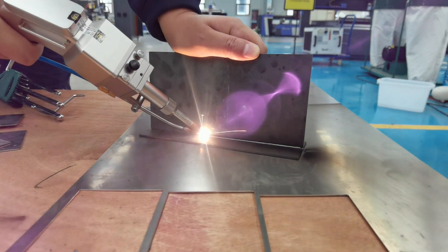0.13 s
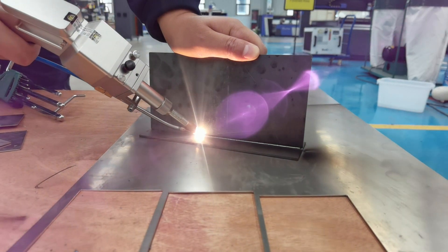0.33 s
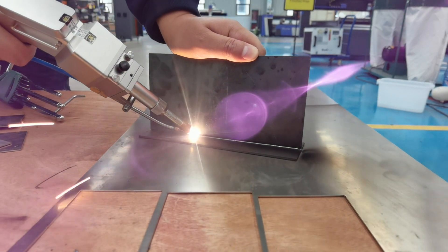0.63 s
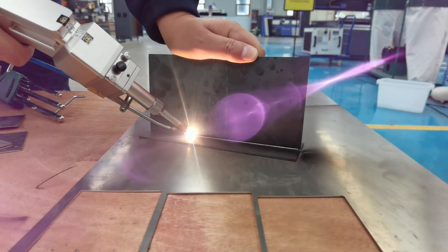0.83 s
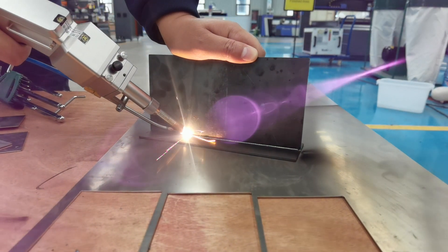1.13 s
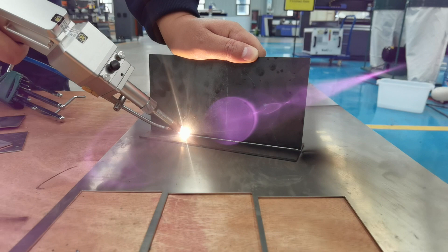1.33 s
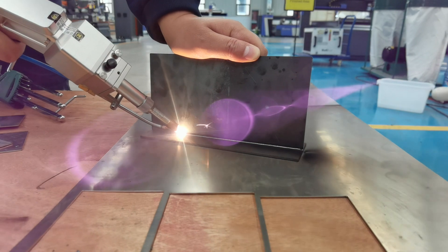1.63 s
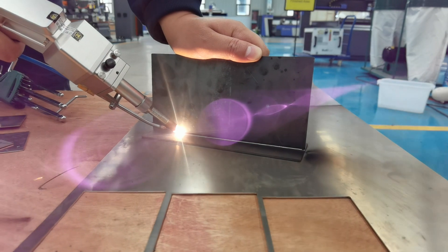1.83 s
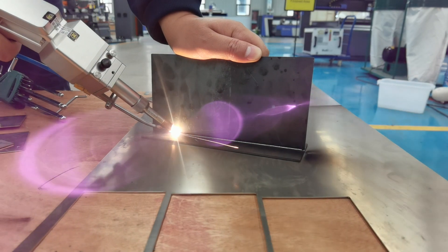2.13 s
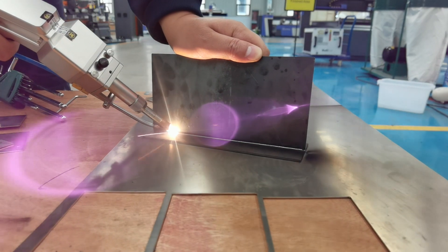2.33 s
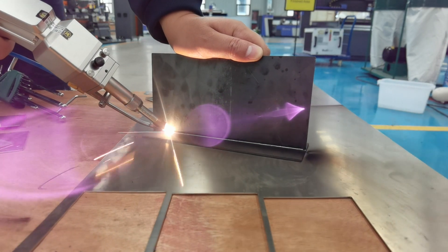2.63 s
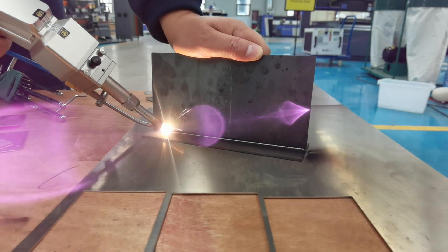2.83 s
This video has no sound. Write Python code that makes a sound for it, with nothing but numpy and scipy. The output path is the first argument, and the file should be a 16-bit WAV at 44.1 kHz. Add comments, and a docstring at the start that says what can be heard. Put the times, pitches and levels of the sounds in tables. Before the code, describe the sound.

Close, steady sizzling hiss of gas and metal vapour from a welding torch on steel plate, already running and never stopping, slightly flickering, with small pops; very faint low workshop hum and air noise beneath.

```python
"""A bright, finely crackling hiss runs throughout, in front: a hand-held laser welder seams a steel plate.
Shielding gas and metal vapour make turbulent noise, which flickers band by band, sputters and pops.
The torch creeps left, so the delay and level at each ear change; the plates colour each ear's hiss.
Behind it are the hall's reverberation, noise-like ventilation, wavering mains hum and short drones."""
import sys
import numpy as np
from scipy import signal
from scipy.fft import rfft, irfft
from scipy.io import wavfile
from scipy.ndimage import uniform_filter1d, map_coordinates

SR = 44100
rng = np.random.default_rng(int(sys.argv[2]) if len(sys.argv) > 2 else 0)


def inscribe(sig):
    """Save sig as 16-bit PCM at rate SR to the path in sys.argv[1].

    A 1-D sig is mono; a 2-D sig holds one channel per row.
    Samples are clipped to [-1, 1] before scaling.
    """
    pcm = np.round(np.clip(np.atleast_2d(sig).T, -1, 1) * 32767)
    wavfile.write(sys.argv[1], SR, pcm.astype(np.int16))


N = 131418
TIME, FREQS = np.arange(N) / SR, np.arange(N // 2 + 1) * SR / N   # s, Hz

# Strength of the whole jet: time_s, gain_db
JET_STRENGTH = [(0, 4.5), (.11, 2.5), (.135, -1), (.17, -1.7), (.19, 2), (.5, 3), (1.1, 2.1), (1.7, 0.97),
                (2.15, 0.9), (2.4, 0.6), (2.75, 0.1), (2.98, 1)]
# Gain of the jet's low roar: time_s, gain_db
ROAR_GAIN = [(0, -2.5), (.15, -4.5), (.25, -4), (.7, 1), (1.3, 0.5), (2, 0), (2.5, 0.5), (2.98, -2.5)]
# Gain of the jet's bright core: time_s, gain_db
CORE_GAIN = [(0, -4.5), (.3, -0.5), (.7, -1), (1.3, 1), (2.1, -1), (2.6, -0.5), (2.98, -.5)]
# Gain of the jet's treble: time_s, gain_db
TREBLE_GAIN = [(0, 2.3), (.15, 4.5), (.3, 1.5), (.7, -0.5), (1.5, 0.4), (2.2, 2), (2.98, -1.5)]
# Larger pops of spatter: start_s, level_db (above the hiss)
SPATTER_POPS = [(0.096, 3), (0.121, 3), (1.353, 6), (2.867, 6)]
# Early echoes off the bench and nearby machines: delay_ms, gain_db
EARLY_ECHOES = [(3.6, -34), (5.9, -22), (7.5, -20.5), (10.3, -16.5), (17.9, -17.5)]
# Share of the hiss power arriving directly, the rest by way of the hall: frequency_hz, share_0_to_1
DIRECT_POWER_SHARE = [(340, 0.71), (690, 0.85), (1590, 0.91), (1680, 0.64), (1850, 0.84), (1980, 0.65),
                      (2200, 0.78), (2450, 0.67), (2630, 0.93), (3060, 0.88), (3320, 0.33), (3490, 0.25),
                      (3570, 0.51), (3750, 0.44), (3960, 0.88), (4950, 0.75), (5040, 0.52), (5170, 0.8),
                      (5340, 0.79), (5430, 0.6), (5680, 0.92), (6500, 0.91), (6980, 0.68), (7410, 0.87),
                      (7880, 0.73), (8230, 0.89), (8830, 0.79), (9300, 0.33), (9390, 0.68), (10210, 0.91),
                      (12020, 0.34), (12620, 0.54), (12880, 0.07), (13520, 0.54), (14080, 0.22),
                      (14210, 0.73), (14810, 0.27), (15590, 0.7)]
# Colour the plates give the hiss at the left ear: frequency_hz, gain_db
LEFT_PLATE_GAIN = [(100, -52), (340, -32.4), (430, -29.3), (520, -28.8), (650, -24.0), (780, -25.2),
                   (1080, -23.3), (1770, -10.3), (1940, -9.6), (2110, -12.1), (2280, -11.3), (2500, -14.1),
                   (2800, -15.0), (2890, -14.3), (3490, -16.0), (3700, -14.6), (3830, -17.4), (4180, -12.5),
                   (4260, -15.8), (4570, -13.6), (4910, -6.5), (5250, -7.2), (5600, -1.6), (5860, -0.3),
                   (6200, -5.1), (6460, -4.5), (6800, -13.5), (6980, -15.5), (7360, -11.5), (8610, -5.7),
                   (9690, -14.4), (9950, -5.8), (10420, -5.0), (10940, -8.7), (11200, -16.3),
                   (11670, -23.4), (11800, -18.0), (12750, -16.7), (13050, -19.7), (13700, -16.8),
                   (14470, -25.3), (14900, -19.6), (15590, -18.9)]
# Colour the plates give the hiss at the right ear: frequency_hz, gain_db
RIGHT_PLATE_GAIN = [(100, -52), (340, -32.5), (430, -30.0), (520, -32.1), (690, -25.5), (820, -29.6),
                    (950, -24.9), (1160, -26.6), (1290, -20.1), (1420, -17.1), (1510, -16.6), (1720, -21.7),
                    (1850, -17.4), (1980, -19.4), (2070, -18.4), (2200, -12.8), (2280, -11.3),
                    (2670, -14.7), (3060, -16.1), (3450, -24.7), (3620, -18.7), (3750, -20.8),
                    (4090, -13.0), (4440, -14.8), (4650, -10.1), (5040, -14.6), (5250, -8.3), (5430, -13.9),
                    (5640, -4.7), (5860, -0.5), (6120, -5.3), (6290, 0.6), (6930, -7.8), (7710, -9.6),
                    (8270, -5.8), (8610, -6.7), (9000, -14.9), (9730, -13.0), (9860, -9.4), (10250, -9.2),
                    (10640, -16.0), (10940, -16.5), (12100, -27.0), (12580, -23.0), (12880, -29.4),
                    (13520, -20.5), (14170, -21.2), (14430, -24.7), (15590, -19.3)]
# Extra lag at the right ear from reflections off the plates: frequency_hz, lag_rad
RIGHT_PLATE_LAG = [(340, -0.48), (780, -0.02), (900, -0.23), (1120, 0.29), (1250, -0.01), (1640, 0.95),
                   (1770, -0.29), (1940, -0.28), (2150, -1.16), (2410, -0.38), (2630, 0.65), (3320, 0.15),
                   (3530, -1.2), (3920, -0.45), (4520, -0.38), (4650, 0.52), (4820, 0.82), (5000, 0.42),
                   (5080, -0.75), (5340, -0.11), (5600, -1.69), (6030, -0.99), (6160, -1.42), (6850, -0.76),
                   (7360, 1.56), (7670, 1.84), (7970, 0.86), (8310, 1.25), (8960, 0.62), (9350, -1.49),
                   (9520, -1.54), (9730, 0.58), (11630, -0.52), (11710, 1.79), (12140, -0.38),
                   (12830, 1.59), (13010, 3.09), (14940, 5.99), (15120, 10.56), (15590, 10.47)]
# The torch moves left: time_s, right_ear_delay_us, left_gain_db, right_gain_db
TORCH_TRAVEL = [(0, 109, -2, 1.5), (.6, 124.4, -2, 1.5), (1.1, 138.6, -0.5, 2.5), (2.1, 153.4, 0, 2.5),
                (2.45, 155.5, 0, 0), (2.98, 160.5, 1.5, 0.2)]
# Bands whose stereo width varies: low_hz, high_hz
WIDTH_BANDS = [(2620, 3057), (3930, 4287), (7540, 7700)]
# Gain of what the ears share in those bands: time_s, lower_band_db, middle_band_db, upper_band_db
SHARED_GAIN = [(0, 5.5, 5, -1), (.25, -3, -6, 4), (.5, -1, -28, 1), (.85, 3, -7, 5), (1.25, -14, -12, -7),
               (1.55, -9, -12, -3), (2, -28, -24, -1), (2.4, -38, -15, -5), (2.72, -36, -17, -14),
               (2.98, -6, 2, -2)]
# Spectrum of the ventilation: frequency_hz, relative_level_db
VENT_SPECTRUM = [(20, -16), (42, 1.5), (100, 4.5), (130, 3), (200, 7.5), (260, -1), (320, 3.5), (450, -40),
                 (900, -8), (2000, -25), (3000, -35)]
# Course of the ventilation's level: time_s, gain_db
VENT_COURSE = [(0, 8.5), (.12, 0), (.7, 0), (1.6, -0.5), (2, -3), (2.98, -1)]
# Mains hum components: frequency_hz, level_db (rms, before waver and course)
HUM_TONES = [(101, -66), (199, -61.5)]
# Course of the hum's level: time_s, gain_db
HUM_COURSE = [(0, 0), (.8, -2), (1.1, 2.5), (1.7, 1.5), (2.3, -1.5), (2.98, -2.5)]
# Faint machine drones: start_s, length_s, pitch_hz, rise_hz_per_s, level_db (rms at the crest)
MACHINE_DRONES = [(-.03, 0.1, 105, 2, -51), (.62, 0.38, 401, 0, -54.5), (0.857, 0.39, 569, 150, -55)]
# Spectrum of the brief swell of low rush: frequency_hz, relative_level_db
RUSH_SPECTRUM = [(250, -24), (420, 2.5), (600, 5.5), (900, 0), (1300, 9.5), (2000, -22)]

JET_LOW_HZ, ROAR_EDGE_HZ = 375, 2500
CORE_LOW_HZ, CORE_HIGH_HZ = 4470, 5900
TREBLE_LOW_HZ, TREBLE_HIGH_HZ = 6850, 10430
SPUTTER_DB, SPUTTER_HZ = .38, 120     # flicker of the whole hiss
PATCHY_DB, PATCHY_HZ = 1.56, 45       # each band's own flicker
CRACKLES_PER_S, CRACKLE_SPREAD_DB, CRACKLE_DB = 1500, 3, -9.5
POP_DECAY_S = 0.0025
LEFT_DB, RIGHT_DB = -14, -17          # hiss at each ear, before the travel gains
HALL_SMEAR_S = 0.0043                 # reflections blur the sputter over this time
VENT_DB, VENT_GUST_DB, VENT_GUST_HZ = -56, 2, 14
SIDE_DB, SIDE_LOW_HZ = -13, 90        # left-right difference in the low noises
HUM_WAVER_DB, HUM_WAVER_RAD, HUM_WAVER_HZ = 2.5, 1.06, 14
DRONE_WAVER_RAD, DRONE_WAVER_HZ = .5, 28
RUSH_START_S, RUSH_LENGTH_S, RUSH_DB = 1.793, 0.196, -38.5   # rms at the crest
PEAK_LIMIT, CUTOFF_HZ = .88, 15600


def jet():
    """Turbulence: broadband noise with band-by-band fluctuation, impulsive crackle and decaying pops."""
    gas = turbulent_gas() + from_db(CRACKLE_DB) * crackle()
    x = gas * from_db(SPUTTER_DB * drift(SPUTTER_HZ)) + spatter()
    x = high_passed(x, 2, JET_LOW_HZ)
    spectrum = rfft(x)
    roar = irfft(spectrum / (1 + (FREQS / ROAR_EDGE_HZ) ** 6), N)
    core = irfft(spectrum * ((FREQS > CORE_LOW_HZ) & (FREQS < CORE_HIGH_HZ)), N)
    treble = irfft(spectrum * ((FREQS > TREBLE_LOW_HZ) & (FREQS < TREBLE_HIGH_HZ)), N)

    # in turn, add to the hiss what each band gains or loses
    for band, gain in ((roar, ROAR_GAIN), (core, CORE_GAIN), (treble, TREBLE_GAIN)):
        x = x + band * (from_db(in_time(gain)[0]) - 1)
    return x * from_db(in_time(JET_STRENGTH)[0])


def turbulent_gas():
    """Independent fluctuation: each frequency band of the noise varies in level on its own; rms 1."""
    white, gas = rfft(rng.standard_normal(N)), 0
    edges_hz = np.r_[0, np.geomspace(500, 16000, 22), SR]
    for low, high in zip(edges_hz, edges_hz[1:]):
        band = irfft(white * ((FREQS >= low) & (FREQS < high)), N)
        gas = gas + band * from_db(PATCHY_DB * drift(PATCHY_HZ))
    return rms_one(gas)


def crackle():
    """Shot noise: clicks of random time, size and sign; rms 1."""
    size_db = CRACKLE_SPREAD_DB * np.minimum(rng.exponential(1, N), 6)
    sizes = from_db(size_db) * rng.choice([-1, 1], N)
    return rms_one(sizes * (rng.random(N) < CRACKLES_PER_S / SR))


def spatter():
    """Exponential decay: each pop is a burst of noise that starts abruptly and dies away."""
    envelope = 0
    for start, db in SPATTER_POPS:
        decay = np.exp(-np.abs(TIME - start) / POP_DECAY_S)
        envelope = envelope + from_db(db) * (TIME >= start) * decay
    return rng.standard_normal(N) * envelope


def echoed(x):
    """Comb filtering: early echoes added to the hiss put a fine ripple into its spectrum."""
    return x + sum(from_db(db) * np.roll(x, int(ms * SR / 1000)) for ms, db in EARLY_ECHOES)


def at_ears(x):
    """Interaural difference: delay, level and plate reflections differ between the two ears."""
    delay_us, left_db, right_db = in_time(TORCH_TRAVEL)
    share = np.clip(over_hz(DIRECT_POWER_SHARE), 0, 1)
    direct = np.sqrt(share) * rfft(x)
    diffuse = np.sqrt(1 - share) * rfft(hall(x))
    left, right = irfft(direct + diffuse, N)
    left = coloured(left, LEFT_PLATE_GAIN)
    right = coloured(right, RIGHT_PLATE_GAIN, over_hz(RIGHT_PLATE_LAG))

    # read the right ear's sound at a moving, fractional delay
    position = (TIME - delay_us / 1e6) * SR
    right = map_coordinates(right, [position], order=5, mode="mirror")
    return np.array([left * from_db(LEFT_DB + left_db), right * from_db(RIGHT_DB + right_db)])


def hall(x):
    """Diffuse field: independent noise on each side follows the jet's power, slightly blurred in time."""
    power = uniform_filter1d(x ** 2, max(2, int(HALL_SMEAR_S * SR)))
    return rng.standard_normal((2, N)) * np.sqrt(np.abs(power))


def varied_width(ears):
    """Stereo width: the part common to both ears is turned up or down in three bands; low sounds hollow."""
    common = rfft(ears.mean(axis=0))
    for (low, high), db in zip(WIDTH_BANDS, in_time(SHARED_GAIN)):
        band = 1 / (1 + ((2 * FREQS - low - high) / (high - low)) ** 12)
        ears = ears + (from_db(db) - 1) * irfft(common * band, N)
    return ears


def mains_hum():
    """Modulated tones: sines waver at random in level and phase."""
    hum = 0
    for hz, db in HUM_TONES:
        level = from_db(db + HUM_WAVER_DB * drift(HUM_WAVER_HZ))
        phase = 2 * np.pi * hz * TIME + HUM_WAVER_RAD * drift(HUM_WAVER_HZ)
        hum = hum + np.sqrt(2) * level * np.sin(phase)   # root 2 turns rms into peak
    return hum * from_db(in_time(HUM_COURSE)[0])


def machine_drones():
    """Frequency glide: the phase is the integral of a steady or rising pitch, with a random waver."""
    drones = 0
    for start, length, hz, rise, db in MACHINE_DRONES:
        elapsed = TIME - start
        phase = 2 * np.pi * (hz + .5 * rise * elapsed) * elapsed
        phase = phase + DRONE_WAVER_RAD * drift(DRONE_WAVER_HZ)
        drones = drones + np.sqrt(2) * from_db(db) * arch(start, length) * np.sin(phase)
    return drones


def rush_swell():
    """Amplitude envelope: low coloured noise rises and falls once."""
    return from_db(RUSH_DB) * arch(RUSH_START_S, RUSH_LENGTH_S) * low_noise(RUSH_SPECTRUM)


def ventilation():
    """Flow noise: coloured low noise flutters about a slowly changing level."""
    level_db = VENT_DB + in_time(VENT_COURSE)[0] + VENT_GUST_DB * drift(VENT_GUST_HZ)
    return from_db(level_db) * low_noise(VENT_SPECTRUM)


def workshop():
    """Superposition: hum, drones, swell and ventilation add linearly."""
    return mains_hum() + machine_drones() + rush_swell() + ventilation()


def low_noise(spectrum):
    """Interaural coherence: a weak side signal, fading in the deep bass, widens common noise; rms 1."""
    mid, side = rng.standard_normal((2, N))
    side = high_passed(side, 1, SIDE_LOW_HZ)
    return coloured(mid + from_db(SIDE_DB) * np.array([side, -side]), spectrum)


def from_db(db):
    """Logarithmic level: decibels to amplitude gain."""
    return 10 ** (np.asarray(db) / 20)


def rms_one(x):
    """Normalisation: scale to unit rms."""
    return x / np.sqrt(np.mean(x ** 2) + 1e-20)


def in_time(rows):
    """Linear interpolation: each column of a curve at every sample."""
    seconds, *columns = np.transpose(rows)
    return [np.interp(TIME, seconds, column) for column in columns]


def over_hz(points):
    """Logarithmic pitch axis: a table interpolated at every frequency."""
    hz, value = np.transpose(points)
    return np.interp(np.log(FREQS + 1), np.log(hz), value)


def high_passed(x, order, hz):
    """High-pass filtering: weaken what lies below the given frequency."""
    return signal.sosfilt(signal.butter(order, hz, "high", fs=SR, output="sos"), x)


def coloured(x, spectrum, lag_rad=0):
    """Linear filtering: multiply the spectrum by a gain and a phase lag; rms 1."""
    response = from_db(over_hz(spectrum)) * np.exp(-1j * lag_rad)
    return rms_one(irfft(rfft(x) * response, N))


def drift(hz):
    """Low-passed noise: random motion, mostly slower than the given rate, of mean 0 and rms 1."""
    low_pass = (FREQS > 0) / (1 + (FREQS / hz) ** 2)
    return rms_one(irfft(rfft(rng.standard_normal(N)) * low_pass, N))


def arch(start, length):
    """Envelope: a rounded rise and fall, the root of a half sine."""
    return np.sqrt(np.abs(np.sin(np.pi * np.clip((TIME - start) / length, 0, 1))))


def scene():
    """Superposition: the weld close by and the workshop around it."""
    return varied_width(at_ears(echoed(jet()))) + workshop()


def record(dry):
    """Saturation and band limiting: the highest peaks are rounded and the top is cut steeply."""
    rounded = dry / (1 + (dry / PEAK_LIMIT) ** 8) ** (1 / 8)
    # passband ripple 0.1 dB, stopband 90 dB down
    low_pass = signal.ellip(12, .1, 90, CUTOFF_HZ, fs=SR, output="sos")
    return signal.sosfilt(low_pass, rounded)


dry = scene()
out = record(dry)
inscribe(out)
```